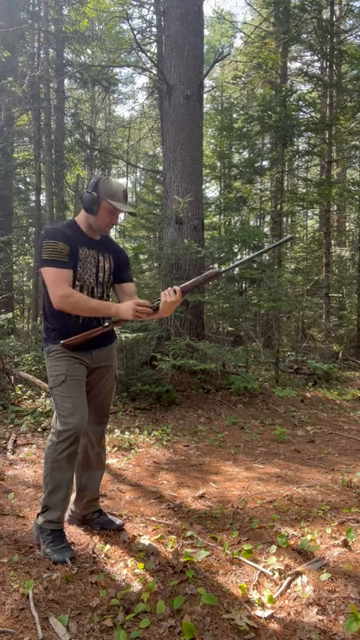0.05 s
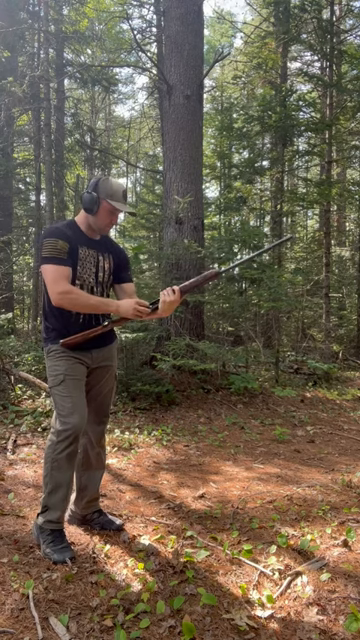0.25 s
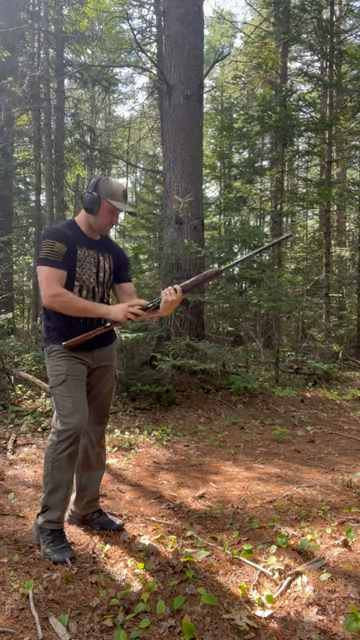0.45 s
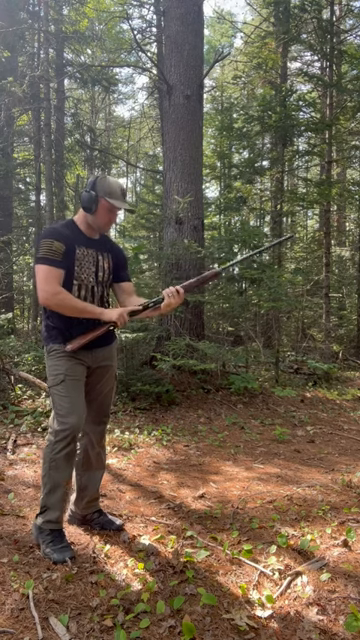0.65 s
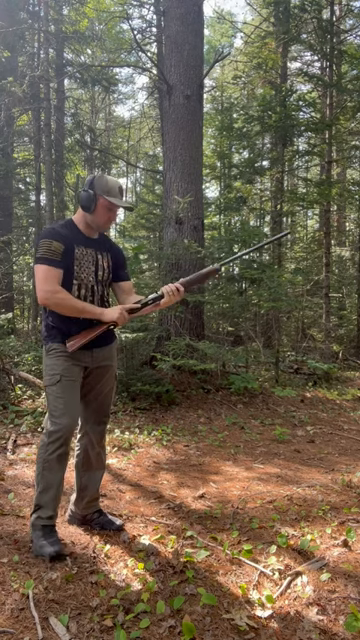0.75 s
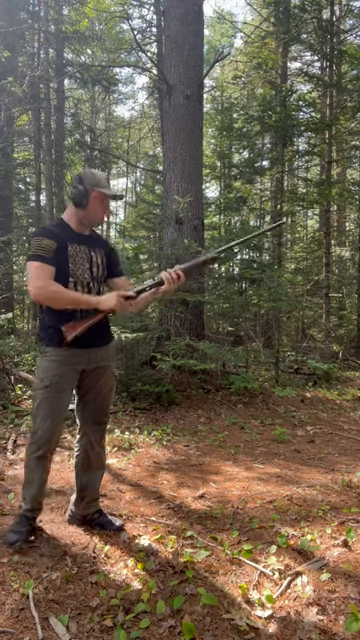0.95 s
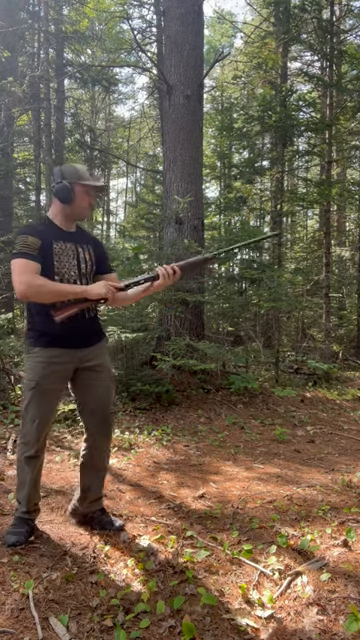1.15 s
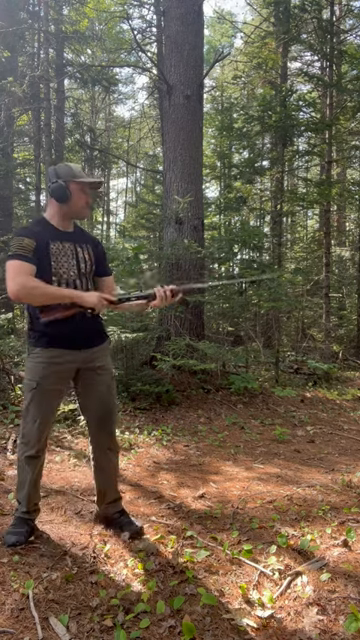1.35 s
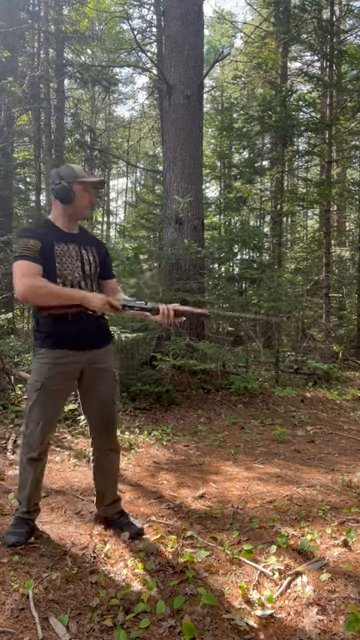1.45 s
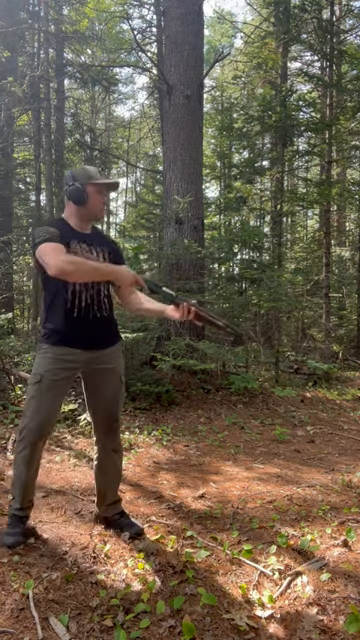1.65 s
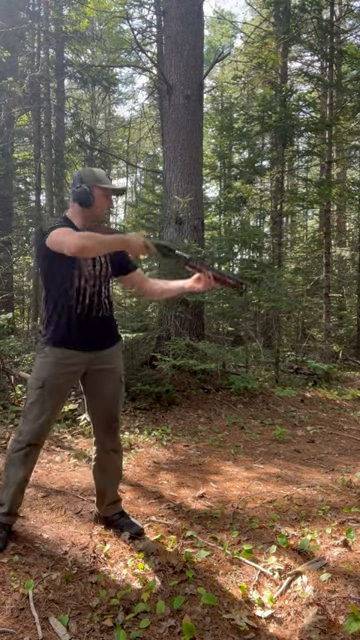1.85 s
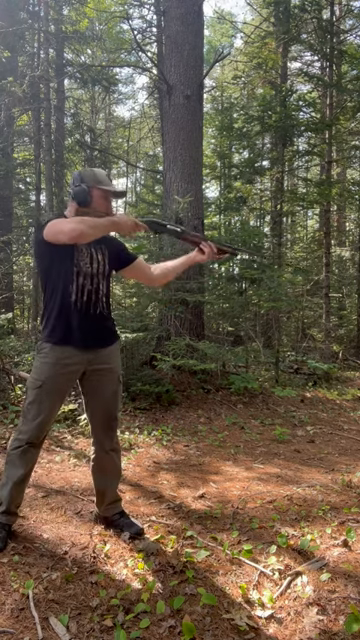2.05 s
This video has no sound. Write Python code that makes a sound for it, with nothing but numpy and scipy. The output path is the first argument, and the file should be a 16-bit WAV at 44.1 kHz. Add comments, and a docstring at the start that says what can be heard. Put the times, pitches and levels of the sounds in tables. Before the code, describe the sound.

A shotgun bolt slides and slams shut in a sharp double clack, ringing briefly and echoing among trees. Soft handling knocks, clothing swishes and shifting feet follow, close to the microphone in a quiet forest clearing.

```python
"""A forest clearing, stereo microphone close to a shooter. Over quiet air in the trees a shotgun's bolt
is released, slides and slams home in two clusters of steel contacts that ring the gun and scatter
among the trunks. As it locks, the stock booms and the barrel sings on. Then the gun is raised:
dull handling knocks, small ticks, swishes of clothing and feet shifting on the needles."""
import sys
import numpy as np
from scipy import signal
from scipy.fft import rfft, irfft, next_fast_len
from scipy.io import wavfile
from scipy.ndimage import map_coordinates

SR = 44100
rng = np.random.default_rng(int(sys.argv[2]) if len(sys.argv) > 2 else 0)


def master_out(mix):
    """Clip the mix to full scale and print it as 16-bit PCM to the path in sys.argv[1]."""
    frames = np.transpose(np.atleast_2d(mix))
    ceiling = np.clip(frames, -1, 1)
    pcm = np.round(ceiling * 32767).astype(np.int16)
    wavfile.write(sys.argv[1], SR, pcm)


N = 92610

# air in the trees, all around: (frequency [Hz], level [dB])
AIR_SPECTRUM = [(100, -10), (400, -5.5), (1000, 0.5), (1700, -2.5), (2600, -9.5), (6500, -17.5),
                (11000, -32.5), (15500, -36.5)]
# low rumble under the air: (frequency [Hz], level [dB])
RUMBLE_SPECTRUM = [(20, -22.5), (48, -0.5), (75, -5.5), (130, -11), (600, -49)]
# the rumble's slow rise and fall: (time [s], gain [dB])
RUMBLE_SWELL = [(0, 2), (.12, 7), (.5, -6.5), (1, -9), (1.401, -3.5), (2.1, 2.5)]
# likeness of left and right for sound from all sides: (frequency [Hz], correlation [-1 to 1])
STEREO_LIKENESS = [(80, 0.96), (300, 1), (700, 0.07), (3000, -0.31), (7000, -0.048), (11000, -0.88),
                   (13500, 0.98)]
# catch, hands and feet, close by: (time [s], level [dB], mid pitch [Hz], t60 [s], relative click [dB])
HANDLING_KNOCKS = [(.2010, -30, 1300, 0.0091, 10.5), (.2146, -37, 331, 0.034, 22),
                   (0.351, -20, 1066, 0.0089, -14), (.814, -48.5, 903, .015, -19),
                   (1.1279, -25.5, 1024, 0.0059, -12), (1.6829, -28.5, 780, 0.008, -25),
                   (1.7412, -39, 790, 0.017, -24), (1.767, -44, 694, 0.02, -22.5),
                   (1.8175, -44.5, 825, 0.0091, -24), (2.0368, -35, 388, 0.012, -20)]
# steel on steel in the action: (time [s], level [dB], low band [dB], top band [dB], t60 [s])
STEEL_CONTACTS = [(0.2096, -30, -11.5, -3, 0.12), (0.2121, -17, -1.5, 8.5, 0.015),
                  (0.2149, -17.5, -7, -4, 0.013), (0.2185, -25, -3.5, 0.5, 0.012),
                  (0.2189, -21.5, -1, -2, 0.05), (0.237, -25, -1.5, -5.5, .012),
                  (0.248, -29.5, -11, 0.5, .015), (0.2553, -20, 1, 0.5, 0.029),
                  (0.2588, -21.5, -2, 1.5, 0.04), (0.2663, -10, -3, -6, 0.013), (0.2675, -21.5, 0, 4, 0.03),
                  (0.2723, -19.5, -2, -1.5, 0.039), (.2760, -22.5, 1, -2, .03), (.3490, -27, -12, 5, .013)]
# the crack of a contact: (frequency [Hz], level [dB])
STEEL_SPECTRUM = [(100, -29.5), (300, -15), (650, -6.5), (1100, 1.5), (1750, 3.5), (2400, -1), (3400, 1),
                  (5500, 3.5), (7200, 0), (9000, -5.5), (11000, -2), (13500, -3.5), (15400, -3.5),
                  (16500, -15.5)]
# ring of receiver and bolt: (frequency [Hz], level [dB], t60 [s])
RECEIVER_MODES = [(1104, 1, 0.12), (1384, -1, .14), (1710, 2, 0.16), (1845, 1, 0.2), (2010, -2.5, .16),
                  (2111, -3, 0.25), (3680, 3, 0.14), (5125, -2, 0.12), (5276, -1, 0.16), (6521, -3.5, .3),
                  (14600, 2, .12)]
# echo off the trees: (frequency [Hz], level [dB])
ECHO_SPECTRUM = [(100, -6), (1000, -5), (2500, 0.5), (5500, -4), (13000, -5.5)]
# decay among the far trees: (frequency [Hz], t60 [s])
FAR_DECAY = [(150, 0.49), (700, 1), (2000, 0.83), (5500, 0.86), (13000, 0.57)]
# boom of the wooden stock: (frequency [Hz], level [dB], t60 [s])
STOCK_MODES = [(142, -41, .12), (391, -36.5, 0.2), (644, -44, 0.32)]
# ring of the barrel, its close pair of modes beating: (frequency [Hz], level [dB], t60 [s])
BARREL_MODES = [(4190, -40.5, .48), (4165, -44, .45), (5940, -42, .42)]
# rubbed fabric: (frequency [Hz], level [dB])
CLOTH_SPECTRUM = [(300, -22.5), (1500, -4), (3000, -7), (6000, 2), (7500, 1.5), (10500, -6), (13500, 2.5),
                  (15800, -4.5)]
# the shooter's clothing: (peak time [s], level [dB], rise [s], fall [s])
CLOTH_SWISHES = [(.79, -58.5, 0.067, 0.1), (.91, -57, 0.036, 0.033), (1.31, -64.5, 0.072, 0.088),
                 (1.36, -56, 0.023, 0.011), (1.55, -70.5, 0.11, 0.075), (1.70, -59, 0.028, 0.042),
                 (1.785, -59.5, 0.043, 0.052)]
# feet shifting on the ground: (peak time [s], level [dB], rise [s], fall [s])
FOOT_SCUFFS = [(.9, -60.5, 0.091, 0.057), (1.13, -66, 0.11, 0.1), (1.68, -56, 0.012, .04),
               (1.775, -58, 0.021, 0.042), (1.91, -63.5, 0.049, 0.034)]
# needle litter underfoot: (frequency [Hz], level [dB])
LITTER_SPECTRUM = [(100, -20), (400, -4.5), (750, 1), (1200, -4.5), (2200, -17.5), (6000, -20.5)]
# balance of the direct sound: (frequency [Hz], left minus right [dB])
STEREO_BALANCE = [(120, -2), (600, 4.5), (1600, 6.5), (2900, 6.5), (3700, -3.5), (6000, 1.2), (14000, -0.5)]
# phase between left and right: (frequency [Hz], left lead [rad])
STEREO_PHASE = [(100, 1), (1000, 0.3), (3000, -1), (4500, 1.28), (7000, 1), (9000, 6), (11000, 4),
                (13000, 6.5)]
# the microphone's treble notch: (frequency [Hz], gain [dB])
MIC_NOTCH = [(7200, -0.5), (7900, -3), (8400, -26.5), (9600, -25), (10500, -0.5), (11300, 3)]

AIR_DB, RUMBLE_DB = -62, -67
KNOCK_RISE_S, KNOCK_SAG, SAG_S = 0.0011, 0.5, 0.0022  # the sag is a fraction of mid pitch
CLICK_HZ, CLICK_WIDTH_HZ, CLICK_T60_S = 5650, 450, .009
CRACK_DB, CRACK_RISE_S, RING_DB = 4.5, 0.00014, -30.5  # CRACK_DB: how hard the action is slammed
LOW_BAND_HZ, TOP_BAND_HZ = 2388, 8700  # band edges of a contact's colour
FAR_DB, NEAR_DB, NEAR_T60_S, ECHO_BUILD_S = -14.5, -10.5, 0.15, .006
LOCK_S, LOCK_RISE_S = .272, 0.0036
TICKS_PER_S, TICK_DB = 14, -46.5
MIC_LIMIT_HZ = 16100


def amp(db):
    """Decibels to amplitude."""
    return 10 ** (np.asarray(db) / 20)


def unit(x):
    """x scaled to rms 1."""
    return x / np.sqrt(np.mean(x ** 2) + 1e-20)


def along(points, hz):
    """Interpolate (frequency, value) points on a log axis."""
    f, v = np.transpose(points)
    return np.interp(np.log(hz + 1), np.log(f + 1), v)


def filtered(x, response):
    """x through a complex frequency response."""
    m = next_fast_len(x.shape[-1] + SR // 20)
    return irfft(rfft(x, m) * response(np.fft.rfftfreq(m, 1 / SR)), m)[..., :x.shape[-1]]


def coloured(x, spectrum):
    """x shaped by (frequency, level) points."""
    return filtered(x, lambda hz: amp(along(spectrum, hz)))


def wobble(rate):
    """A smooth random curve, rate knots a second."""
    return map_coordinates(rng.standard_normal(int(N * rate / SR) + 4), [np.arange(N) * rate / SR])


def add(track, s, x):
    """Mix x into the track at time s."""
    part = track[round(s * SR):][:len(x)]
    part += x[:len(part)]


def diffuse(spectrum):
    """Stereo noise of rms 1 that reaches the microphone from all sides."""
    def mid_and_side(hz):
        turn = np.arccos(np.clip(along(STEREO_LIKENESS, hz), -1, 1)) / 2
        return amp(along(spectrum, hz)) * [np.cos(turn), np.sin(turn)]
    mid, side = filtered(rng.standard_normal((2, N)), mid_and_side)
    return unit(np.array([mid + side, mid - side]))


def forest_air():
    """All around the clearing: a faint rush in the trees and an uneven low rumble."""
    rush = amp(AIR_DB + 1.7 * wobble(18)) * diffuse(AIR_SPECTRUM)
    swell_db = np.interp(np.arange(N) / SR, *np.transpose(RUMBLE_SWELL))
    rumble = amp(RUMBLE_DB + swell_db + 1.9 * wobble(8.4)) * diffuse(RUMBLE_SPECTRUM)
    return rush + rumble


def knocks():
    """Catch, hands and feet: damped thuds that sag in pitch, each with the click of a small steel part."""
    out, t = np.zeros(N), np.arange(SR // 20) / SR
    small_part = lambda f: 1j * f * CLICK_WIDTH_HZ / (CLICK_HZ ** 2 - f ** 2 + 1j * f * CLICK_WIDTH_HZ)
    for s, db, hz, t60, click_db in HANDLING_KNOCKS:
        pitch = hz * (1 + KNOCK_SAG * (np.exp(-t / SAG_S) - .5))
        envelope = (1 - np.exp(-t / KNOCK_RISE_S)) * amp(-60 * t / t60)
        motion = np.sin(2 * np.pi * np.cumsum(pitch) / SR) * envelope
        thud = np.gradient(motion) * SR / (2 * np.pi * hz)
        click = unit(filtered(rng.standard_normal(len(t)), small_part))
        click *= amp(click_db - 60 * t / CLICK_T60_S)
        add(out, s, amp(db) * (2 * thud + click))
    return out


def bolt_action():
    """Each steel contact is a short crack with its own colour, and rings the gun in that colour."""
    out, t, crack_t = np.zeros(N), np.arange(SR // 2) / SR, np.arange(SR // 12) / SR
    mode_hz, mode_db, mode_t60 = np.transpose(RECEIVER_MODES)
    envelopes = amp(-60 * t / mode_t60[:, None]) * (1 - np.exp(-t / CRACK_RISE_S))
    rings = envelopes * np.exp(2j * np.pi * mode_hz[:, None] * t)
    for s, db, low_db, top_db, t60 in STEEL_CONTACTS:
        colour_db = lambda hz: low_db / (1 + (hz / LOW_BAND_HZ) ** 6) + top_db * (hz > TOP_BAND_HZ)
        steel = unit(coloured(rng.standard_normal(len(crack_t)), STEEL_SPECTRUM))
        crack = steel * (1 - np.exp(-crack_t / CRACK_RISE_S)) * amp(-60 * crack_t / t60)
        add(out, s, amp(db + CRACK_DB) * filtered(crack, lambda hz: amp(colour_db(hz))))
        struck = amp(mode_db + colour_db(mode_hz)) * np.exp(2j * np.pi * rng.random(len(mode_hz)))
        add(out, s, amp(db + CRACK_DB + RING_DB) * (struck[:, None] * rings).real.sum(0))
    return out


def forest_echo(x):
    """Ground and near trunks answer quickly; the far trees leave a longer tail."""
    hz, frame_s, bands = signal.stft(diffuse(ECHO_SPECTRUM)[:, :SR], SR, nperseg=256)
    bands *= amp(-60 * frame_s / along(FAR_DECAY, hz)[:, None])
    far = signal.istft(bands, SR, nperseg=256)[1][:, :SR]
    t = np.arange(SR) / SR
    near = diffuse(ECHO_SPECTRUM)[:, :SR] * amp(-60 * t / NEAR_T60_S)
    build = 1 - np.exp(-t / ECHO_BUILD_S)
    tail = sum(amp(db) * part * build / np.linalg.norm(part[0] * build)
               for db, part in [(FAR_DB, far), (NEAR_DB, near)])
    return signal.fftconvolve(x[None], tail, axes=1)[:, :N]


def stock_and_barrel():
    """As the bolt locks, the stock's low boom and the barrel's thin ring swell up and die away."""
    out, t = np.zeros(N), np.arange(SR // 2) / SR
    ring = sum(amp(db - 60 * t / t60) * np.sin(2 * np.pi * hz * t)
               for hz, db, t60 in STOCK_MODES + BARREL_MODES)
    add(out, LOCK_S, ring * (1 - np.exp(-t / LOCK_RISE_S)))
    return out


def ticks():
    """Sparse dry ticks of fabric and fingers once the bolt has locked."""
    onsets = (rng.random(N) < TICKS_PER_S / SR) * (np.arange(N) / SR > LOCK_S)
    return amp(TICK_DB) * coloured(onsets * rng.standard_normal(N), CLOTH_SPECTRUM)


def rubbing(strokes, spectrum, grain_db=2.0):
    """Grainy friction of cloth or needles that swells and fades with each stroke."""
    t = np.arange(N) / SR
    power = sum(amp(db) ** 2 * np.exp(-((t - s) / np.where(t < s, rise, fall)) ** 2)
                for s, db, rise, fall in strokes)
    grains = rng.standard_normal(N) * amp(grain_db * (wobble(500) + 0.62 * wobble(60)))
    return np.sqrt(power) * unit(coloured(grains, spectrum))


def stereo_image(x):
    """Direct sound differs left and right in level and phase."""
    sides = np.array([[.5], [-.5]])
    balance = lambda hz: amp(sides * along(STEREO_BALANCE, hz))
    return filtered(x, lambda hz: balance(hz) * np.exp(1j * sides * along(STEREO_PHASE, hz)))


def scene():
    """Gun and shooter close up, their echo from the trees beyond, air all around."""
    gun = bolt_action()
    handling = knocks() + ticks()
    handling += rubbing(CLOTH_SWISHES, CLOTH_SPECTRUM) + rubbing(FOOT_SCUFFS, LITTER_SPECTRUM)
    direct = stereo_image(gun + stock_and_barrel() + handling)
    return direct + forest_echo(gun + amp(-3) * handling) + forest_air()


def record(dry):
    """The microphone has a deep notch in the treble and a steep band limit."""
    return filtered(dry, lambda hz: amp(along(MIC_NOTCH, hz)) / (1 + (hz / MIC_LIMIT_HZ) ** 160))


dry = scene()
out = record(dry)
master_out(out)
```